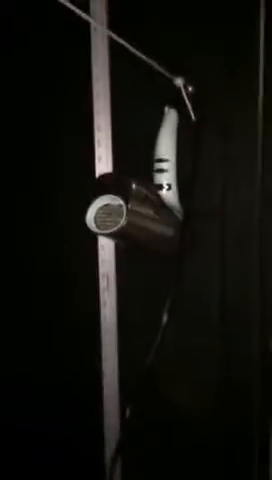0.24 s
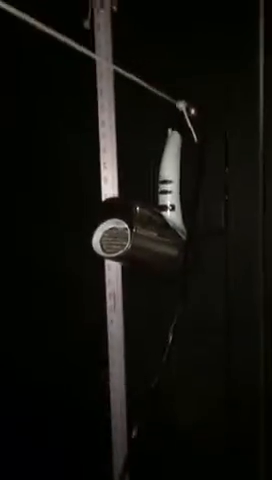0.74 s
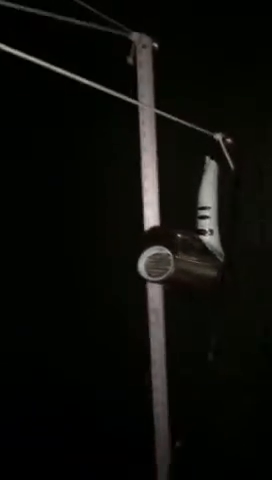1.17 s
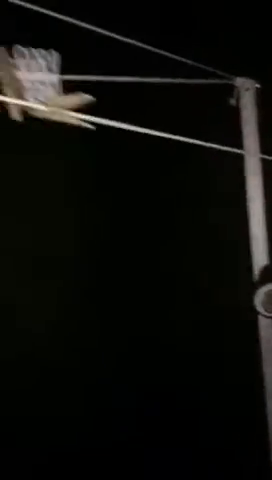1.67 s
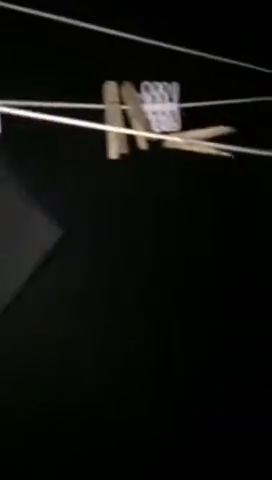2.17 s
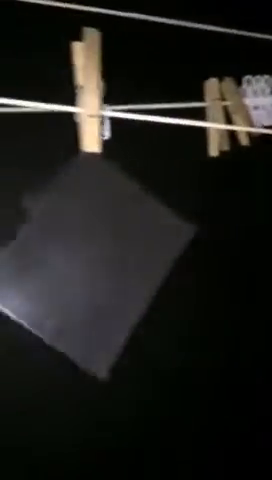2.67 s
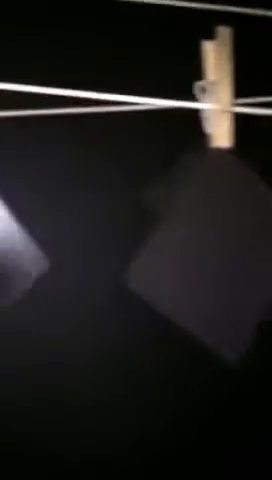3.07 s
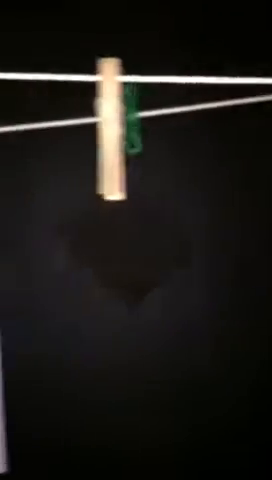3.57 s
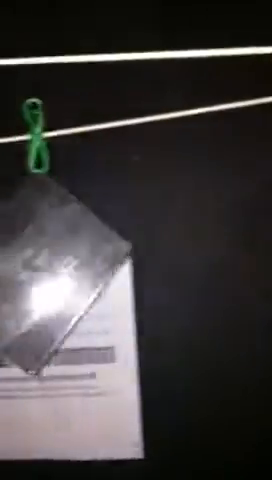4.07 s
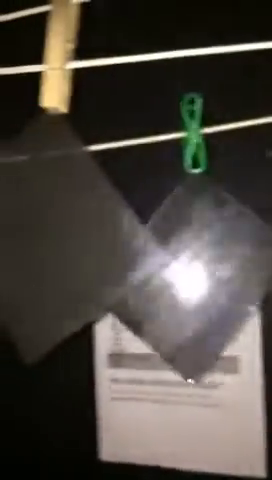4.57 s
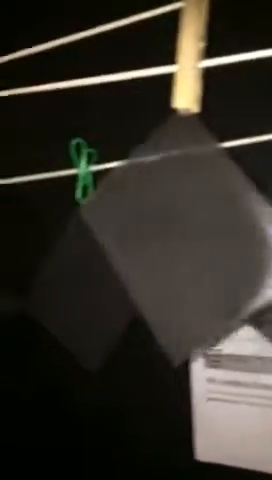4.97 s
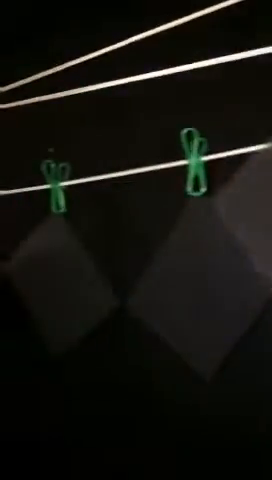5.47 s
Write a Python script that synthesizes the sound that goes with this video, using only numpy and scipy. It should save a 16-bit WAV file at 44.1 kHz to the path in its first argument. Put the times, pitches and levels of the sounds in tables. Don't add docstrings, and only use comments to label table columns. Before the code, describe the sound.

Continuous rush of a hair dryer: hollow mid-low roar, soft steady hiss and a thin motor whine, subtly changing colour throughout.

```python
import sys
import numpy as np
from scipy import signal
from scipy.fft import rfft, irfft
from scipy.io import wavfile
from scipy.ndimage import uniform_filter1d

SR = 44100
rng = np.random.default_rng(int(sys.argv[2]) if len(sys.argv) > 2 else 0)


def unload_audio(sound):
    columns = np.transpose(np.atleast_2d(sound))
    steps = np.round(np.clip(columns, -1, 1) * 32767)
    wavfile.write(sys.argv[1], SR, steps.astype(np.int16))


def volts(x):
    e = np.asarray(x, float) / 20
    return 10 ** e


N = 253125
TIME = np.arange(N) / SR
BLOCK = 2048
RIDGE_CLIMB_PER_S = .015


def evened(x):
    return x / np.sqrt(np.mean(x ** 2) + 1e-20)


def smoothed(x, first, second, axis=-1):
    return uniform_filter1d(uniform_filter1d(x, first, axis=axis), second, axis=axis)


def curve(table, column):
    rows = np.array(table, float)
    return np.interp(TIME, rows[:, 0], rows[:, column])


def read(points, hz):
    f, value = np.transpose(points)
    return np.interp(np.log(hz + 1), np.log(f), value)[:, None]


def bump(t, centre, half):
    return np.exp(-((t - centre) / half) ** 2)


def wander(seconds):
    size = max(int(seconds * SR), 2)
    return evened(smoothed(rng.standard_normal(N), size, size))


def blotches(z, bins, frames):
    field = rng.standard_normal(z.shape[::-1]).T
    field = uniform_filter1d(field, size=bins, axis=0)
    return evened(uniform_filter1d(field, size=frames, axis=1))


def resonate(x, hz, width):
    turn = np.exp(2j * np.pi * np.cumsum(hz * np.ones(N)) / SR)
    r = np.exp(-np.pi * width / SR)
    return 2 * (turn * signal.lfilter([1 - r], [1, -r], x / turn)).real


def ringing(hz, width):
    return evened(resonate(resonate(rng.standard_normal(N), hz, width), hz, width))


def steadied(x, seconds):
    size = int(seconds * SR)
    return evened(x / np.sqrt(smoothed(x ** 2, size, size) + 1e-12))


def crossed(spots):
    between = volts(max(db for s, half, db in spots) - 18)
    return between + sum(volts(db) * bump(TIME, s, half) for s, half, db in spots)


def turbulence(spectrum, patchy_db, gust_db):
    # centre_s, depth_db
    dips = [
        (.77, 1.5),
        (1.74, 1.5),
        (2.74, 1.5),
        (3.44, 2),
        (4.68, 1.5),
        (4.87, 4.5),
        (5.06, 3),
        (5.31, 4.5),
    ]
    frames, hz = N // 256 + 5, np.fft.rfftfreq(1024, 1 / SR)
    a, b = rng.standard_normal((frames, 513, 2)).T
    gusts = evened(smoothed(rng.standard_normal(frames), 4, 3))
    lulls_db = sum(db * bump(np.arange(frames) * 256 / SR, s, 0.012) for s, db in dips)
    field_db = patchy_db * blotches(a, bins=24, frames=12)
    field_db = field_db + np.outer(hz / 10000, gust_db * gusts - lulls_db)
    z = (a + 1j * b) * volts(read(spectrum, hz) + field_db)
    return evened(signal.istft(z, nperseg=1024, noverlap=768)[1][:N])


def standing_waves(x, fine_db, broad_db):
    hz, _, z = signal.stft(x, SR, nperseg=4096, noverlap=3072)
    fine = blotches(z, bins=3, frames=30)
    fine = evened(fine - uniform_filter1d(fine, size=9, axis=0)) / (1 + (hz[:, None] / 2500) ** 2)
    broad = blotches(z, bins=16, frames=18) / (1 + (1500 / (hz[:, None] + 1)) ** 2)
    z = z * volts(fine_db * fine + broad_db * broad)
    return evened(signal.istft(z, nperseg=4096, noverlap=3072)[1][:N])


def barrel_boom(boom_db, facing_db):
    hz = 599.7 + 4.2 * TIME - 3 * facing_db
    above_cutoff = signal.cheby2(8, 18, 570, "high", fs=SR, output="sos")
    boom = signal.sosfilt(above_cutoff, ringing(hz, 110))
    return steadied(boom, seconds=0.061) * volts(boom_db - 1.2)


def outlet_rush(facing_db):
    # pitch_hz, level_db per Hz
    rush_spectrum = [(25, -46), (60, -38), (105, -48), (130, -26.5), (420, -10), (480, -9.5), (540, -2),
                     (760, 4), (1500, -1.5), (2150, -5.5), (3200, -12), (5000, -23.5), (9000, -50)]
    rush = turbulence(rush_spectrum, patchy_db=1.57, gust_db=4.0)
    return standing_waves(rush, fine_db=3.5, broad_db=0.5) * volts(-34 - 0.11 * facing_db)


def grille_hiss(distance_m):
    # pitch_hz, level_db per Hz
    hiss_spectrum = [(500, -70), (1500, -69), (2600, -7.5), (3200, -3), (4300, -0.5), (5200, -3.5),
                     (9000, -5.5), (11500, -9.5), (13200, -14.5), (15400, -16.5)]
    hiss = turbulence(hiss_spectrum, patchy_db=1.08, gust_db=0.61)
    return standing_waves(hiss, fine_db=10.0, broad_db=0.9) * volts(-40) / distance_m


def duct_resonances():
    # pitch_hz, width_hz, climb_hz_per_s
    ducts = [
        (483, 34, 0),
        (1836, 125, 15.5),
        (2520, 220, 5),
    ]
    # centre_s, half_length_s, level_db
    duct_spots = [
        [(1.2, 0.94, -51.5), (2.9, 0.5, -51), (4.05, 0.45, -43.5), (4.8, 0.43, -44.5), (5.5, 0.33, -43)],
        [(.35, 0.56, -36.5), (1.85, 0.54, -40), (2.8, 0.43, -45.5), (3.7, 0.35, -43.5), (4.9, 0.23, -52),
         (5.74, 0.38, -45)],
        [(0, 0.24, -41.5), (2.0, 0.84, -48.5), (3.2, 0.18, -60), (5.74, .25, -46.5)],
    ]
    # pitch_hz, width_hz
    passing = [
        (598, 13.6),
        (775, 42),
        (1220, 22),
    ]
    # centre_s, half_length_s, level_db
    passing_spots = [
        [(.6, 0.33, -33), (1.8, 1, -39), (2.85, 0.43, -39.5), (4.5, 0.95, -42)],
        [(0, 0.75, -37), (1.6, 0.67, -40), (3.2, .6, -43), (4.3, 0.55, -41)],
        [(.6, .4, -48), (2.4, 0.44, -42.5), (3.3, 0.56, -54)],
    ]
    out = np.zeros(N)
    for (hz, width, climb), spots in zip(ducts, duct_spots):
        ring = steadied(ringing(hz + climb * TIME, width), seconds=0.94)
        out += volts(-5.0) * crossed(spots) * ring
    for (hz, width), spots in zip(passing, passing_spots):
        out += volts(-2.0) * crossed(spots) * steadied(ringing(hz, width), seconds=0.2)
    return out


def fixed_modes():
    # pitch_hz, width_hz, level_db
    modes = [(121, 11, -77.5), (141.7, 11, -71.5), (209.4, 20, -65.5), (253.5, 32, -73), (950.4, 42, -49.5),
             (1423, 105, -49.5), (1120, 17, -73), (1303, 29, -51.5)]
    # pitch_hz, width_hz, level_db
    whistle = (14730, 260, -69)
    return sum(volts(db + 0.78 * wander(0.19)) * ringing(hz, width) for hz, width, db in modes + [whistle])


def along_walk(x):
    # centre_s, half_length_s, pitch_hz, half_width_hz, level_db
    ridges = [(0.31, .5, 966, 22, 7), (0.72, 0.19, 1120, 17, 5), (0.61, 0.43, 935, 17, -18),
              (0.46, 0.29, 2000, 35, -2), (0.77, .5, 1700, 27, 4), (.1, 0.37, 2240, 43, 7),
              (0.17, .3, 3200, 50, 2.5), (1.55, 0.85, 1290, 42, -8.5), (1.4, .4, 1690, 48, 4.5),
              (1.3, .3, 2900, 44, -11), (1.36, 0.46, 2250, 41, 12.5), (1.4, 0.33, 2520, 45, 7),
              (2.1, 0.57, 940, 18, 2), (1.3, 0.41, 1430, 25, 4.5), (1.7, 0.33, 1300, 20, 5.5),
              (2.3, .25, 2160, 100, -10), (2.4, .4, 2540, 35, 3.5), (2.5, 0.6, 1020, 27, -18),
              (3, 0.46, 1400, 24, -8), (3.0, 0.22, 1995, 25, 10), (3.17, 0.25, 1580, 62, -8),
              (3.5, 0.17, 1455, 18, 4), (3.3, 0.58, 2280, 50, -6), (3, 0.99, 1110, 26, -2),
              (3.7, 0.55, 1930, 22, 3.5), (4.6, 0.88, 3000, 30, -3), (2.9, .7, 2800, 73, -2.5),
              (4.8, .5, 1300, 15, -3), (.6, .5, 810, 10, 6), (4.47, 0.22, 2160, 97, -6),
              (4.36, 0.17, 2950, 30, 13), (4.9, 0.6, 980, 29, 5), (4.74, 0.2, 1450, 50, 3.5),
              (5.4, .6, 1385, 19, 5), (5.1, 0.67, 1230, 65, 2), (5.0, .3, 1900, 30, 1),
              (1.9, 0.88, 543, 22, 7.5), (2.4, 0.89, 970, 8, -7.5), (4.3, 0.64, 727, 24, -11.5),
              (4.6, .8, 625, 8.6, -2.5)]
    # centre_s, half_length_s, pitch_hz, half_width_hz, level_db
    hiss_ridges = [(.1, .25, 7800, 250, 0.5), (.2, .4, 10300, 150, 0.5), (0.74, .9, 4300, 110, 2.5),
                   (1.6, 0.56, 3900, 150, 1.5), (1.3, .25, 11000, 100, 6), (1.4, .3, 12000, 80, 3),
                   (1.45, .25, 6050, 100, 6), (1.85, 0.19, 7200, 100, 2), (3.5, 0.36, 4100, 130, 2),
                   (3.04, .15, 5000, 700, -2), (2.9, .5, 13000, 150, 3), (3.64, .32, 9100, 200, 4.5),
                   (3.7, .25, 6050, 150, 4), (3.9, .35, 5500, 500, -1.5), (4.24, 0.23, 3960, 150, 3.5),
                   (4.4, .2, 8000, 200, 2), (4.7, 0.14, 7500, 500, 0), (5.24, 0.66, 3900, 420, 3),
                   (5.65, .25, 4800, 250, 1), (2.8, 1.4, 3200, 270, -2), (5.3, .6, 13700, 1500, 2),
                   (.1, .2, 13500, 1500, 1), (3.7, .8, 13400, 500, 2), (0.62, .5, 634, 8.1, 0),
                   (1.05, 0.54, 615, 9, 3.5), (2.1, 0.73, 627, 7.9, 4), (4, 0.58, 653, 9, 5.5),
                   (5.6, 0.6, 602, 9, 5.5)]
    hz, t, z = signal.stft(x, SR, nperseg=4096, noverlap=3072)
    field_db = np.zeros(z.shape)
    for rows, climb in ((ridges, RIDGE_CLIMB_PER_S), (hiss_ridges, 0)):
        for s, half, f, width, db in rows:
            pitch_hz = f * (1 + climb * (t - s))
            field_db += db * bump(t, s, half) * bump(hz[:, None], pitch_hz, width)
    return signal.istft(z * volts(field_db), nperseg=4096, noverlap=3072)[1][:N]


def airflow():
    # start_s, boom_db as heard, distance_m
    walk = [(0, -31, 0.78), (.25, -30.5, .9), (.6, -29.5, 1.01), (.93, -35.5, 0.92), (1.15, -29.5, 1.02),
            (1.4, -32, 1.01), (1.8, -31, 0.99), (2.42, -30.5, 1.0), (2.58, -35, 1.01), (2.9, -27.5, 1.07),
            (3.17, -35, 1.06), (3.5, -30.5, 1.05), (4.0, -32, 1.12), (4.4, -34, 1.14), (4.75, -31.5, 0.95),
            (5.3, -37.5, 0.93), (5.6, -33, 1.01), (5.74, -39, 0.97)]
    boom_db, distance_m = curve(walk, column=1), curve(walk, column=2)
    facing_db = boom_db + 32.5
    air = barrel_boom(boom_db, facing_db) + outlet_rush(facing_db) + grille_hiss(distance_m)
    return along_walk(air + duct_resonances() + fixed_modes())


def shaft_tone(order, turns):
    waver = np.sqrt(2) * volts(-.6 + 2.4 * np.tanh(wander(.03)))
    return waver * np.sin(2 * np.pi * (order * turns + .05 * wander(.02) + rng.random()))


def fan():
    # start_s, turns_per_s
    speed = [
        (0, 169.35),
        (.6, 169.37),
        (1.1, 168.94),
        (2.2, 169.0),
        (2.6, 169.32),
        (3.6, 169.33),
        (4.2, 169.46),
        (5.0, 169.42),
        (5.74, 169.15),
    ]
    # multiple, level_db
    shaft = [
        (1, -68.5),
        (6, -52),
        (10, -61),
    ]
    # centre_s, half_length_s, level_db
    blade_spots = [
        [(.1, .4, -51), (.75, .35, -51), (1.5, .45, -45), (2.1, .25, -50), (2.7, .5, -57), (4.5, .35, -52),
         (5.55, .25, -52)],
        [(.1, .3, -55), (1.45, .3, -50), (3.25, .2, -50), (3.65, .3, -49.5), (4.2, .3, -53), (4.7, .3, -51),
         (5.4, .4, -55)],
        [(.1, .3, -57.5), (1.05, .2, -63), (2.15, .25, -63), (3.55, .3, -60), (4.35, .2, -62), (5.15, .3, -61)],
    ]
    # centre_s, half_length_s, level_db
    hum_spots = [
        (.4, .4, -61),
        (1.45, .4, -63),
        (1.95, .3, -66),
        (2.75, .25, -60),
        (3.1, .2, -64),
        (3.5, .12, -59),
        (4.08, .28, -54),
        (4.85, .15, -59),
        (5.3, .16, -54),
    ]
    turns = np.cumsum(curve(speed, column=1)) / SR
    blades = sum(shaft_tone((k + 1) * 7, turns) * crossed(spots) for k, spots in enumerate(blade_spots))
    hum = np.sqrt(2) * np.sin(2 * np.pi * np.cumsum(339.3 + 3 * wander(.06)) / SR)
    hum = hum * crossed(hum_spots) * volts(.6 + 2.5 * wander(.04))
    motor = sum(volts(db + wander(0.11)) * shaft_tone(round(order), turns) for order, db in shaft)
    return blades + hum + motor


def singing():
    # centre_s, half_length_s, pitch_hz, level_db
    sung = [(.3, .25, 760, -46), (.15, .2, 1815, -50), (.35, .22, 1880, -48), (.68, .2, 1120, -47),
            (.85, .22, 1272, -52), (1.0, .25, 1565, -53), (1.05, .3, 698, -47), (1.3, .3, 1440, -52),
            (1.3, .2, 2540, -55), (1.5, .3, 790, -45), (1.9, .4, 945, -50), (2.05, .25, 632, -42),
            (2.1, .4, 696, -48), (2.2, .45, 742, -49), (2.2, .3, 2555, -56), (2.9, .18, 618, -39),
            (2.9, .3, 1995, -53), (3.5, .2, 1460, -49), (3.6, .5, 695, -47), (3.75, .4, 654, -42),
            (3.8, .3, 1945, -52), (4.25, .18, 1090, -49), (4.3, .2, 812, -46), (4.4, .25, 1260, -52),
            (4.5, .25, 965, -50), (4.85, .22, 1460, -50), (5.1, .2, 605, -44), (5.3, .25, 665, -45),
            (5.3, .3, 1390, -51), (5.6, .2, 730, -46), (5.6, .2, 1920, -52), (.7, .2, 1875, -52),
            (1.15, .15, 612, -41), (2.25, .25, 1200, -48.5), (1.7, .2, 1196, -51)]
    size = int(SR / 16)
    out = np.zeros(N)
    for s, half, hz, db in sung:
        t = np.arange(max(s - 1, 0), min(s + 1, N / SR), 1 / SR)[:-1]
        a, b = smoothed(rng.standard_normal((2, 2 * SR)), size, size // 2, axis=1)[:, :len(t)]
        sway = (a + 1j * b) / abs(a + 1j * b) ** .8
        cycles = hz * (t + RIDGE_CLIMB_PER_S * (t - s) ** 2 / 2)
        ring = evened((sway * np.exp(2j * np.pi * cycles)).real)
        out[round(t[0] * SR):][:len(t)] += volts(db + .8) * ring * bump(t, s, half)
    return out


def scene():
    return np.tile(airflow() + fan() + singing(), (2, 1))


def thinned(x):
    # pitch_hz, threshold_db against the mean
    dropped = [(4000, -17), (5000, -14.5), (9000, -12), (12000, -8), (13500, -5.5), (15000, -6.5)]
    hz, _, z = signal.stft(x, SR, nperseg=BLOCK, noverlap=BLOCK * 3 // 4)
    power = uniform_filter1d(uniform_filter1d(abs(z) ** 2, size=3, axis=0), size=5, axis=1)
    usual = uniform_filter1d(power.mean(1), size=15)[:, None]
    threshold_db = read(dropped, hz) + .3 + 3.2 * blotches(z, bins=4, frames=4)
    weak = (power < usual * volts(2 * threshold_db)) & (hz[:, None] > 3500)
    weak = uniform_filter1d(uniform_filter1d(weak * 1., size=3, axis=0), size=2, axis=1) > .01
    return signal.istft(z * np.where(weak, .03, 1), nperseg=BLOCK, noverlap=BLOCK * 3 // 4)[1][:N]


def side_bursts(mono):
    # centre_s, low_edge_hz
    fills = [(0.319, 4630), (0.528, 6270), (0.806, 4630), (1.387, 6500), (1.387, 9800), (1.572, 7540),
             (1.735, 9100), (1.851, 6240), (2.037, 6830), (2.408, 5150), (2.408, 9800), (4.219, 4400),
             (4.219, 5500), (4.312, 4160), (4.591, 7100), (4.637, 7400), (4.754, 6270), (4.963, 5150),
             (5.009, 5150), (5.009, 7400), (5.102, 7400), (5.195, 4160), (5.195, 7100), (5.357, 4180),
             (5.357, 10500), (5.404, 4650), (5.45, 7400), (5.473, 9630), (5.706, 5700)]
    side, hz = np.zeros(N + BLOCK), np.fft.rfftfreq(BLOCK, 1 / SR)
    window = signal.windows.kaiser_bessel_derived(BLOCK, 4 * np.pi)
    for s, low_hz in fills:
        start = round(s * SR) - BLOCK // 2
        block = np.roll(mono, -start)[:BLOCK] * np.hanning(BLOCK)
        level = abs(rfft(block)) * (hz > low_hz) * (hz < low_hz * 1.24)
        fill = irfft(level * np.exp(2j * np.pi * rng.random(len(hz))))
        side[start:start + BLOCK] += volts(1.5) * fill * window
    return side[:N]


def roll_off(x):
    return signal.sosfilt(signal.butter(12, 15580, fs=SR, output="sos"), x)


def record(dry):
    mono = signal.sosfilt(signal.butter(2, 35, "high", fs=SR, output="sos"), dry[0])
    band_limit = signal.firwin(1535, 15295, window=("kaiser", 9), fs=SR)
    mono = signal.oaconvolve(thinned(mono), band_limit, "same")
    mix = mono + np.outer([1, -1], side_bursts(mono))
    return roll_off(mix)


dry = scene()
out = record(dry)
unload_audio(out)
```